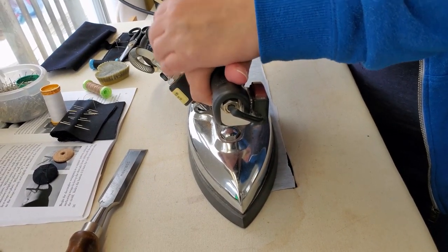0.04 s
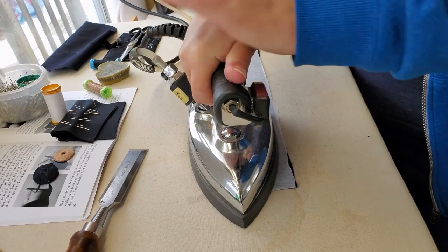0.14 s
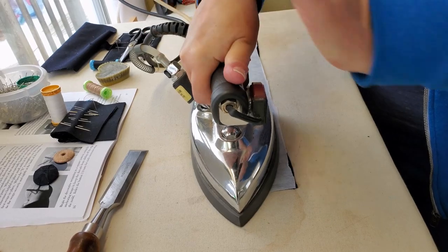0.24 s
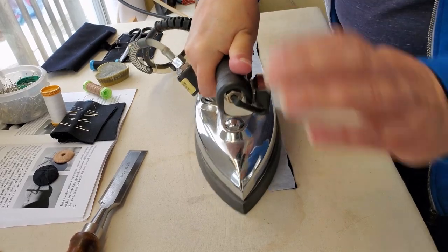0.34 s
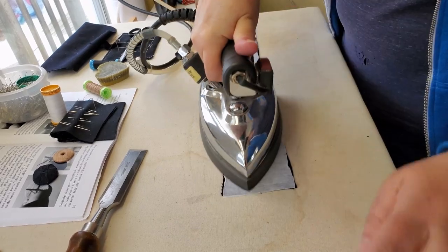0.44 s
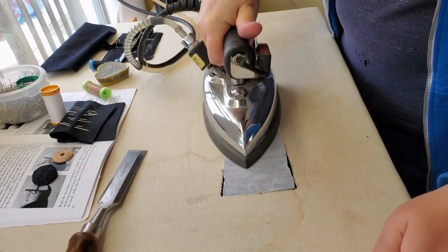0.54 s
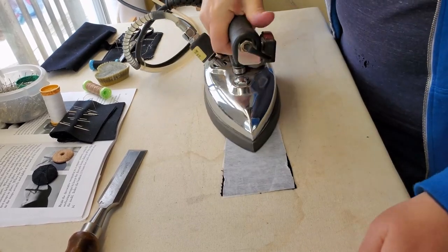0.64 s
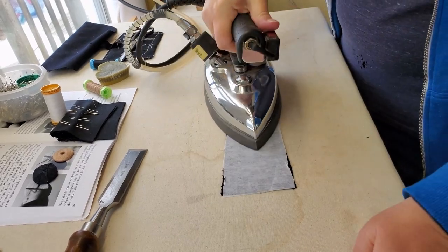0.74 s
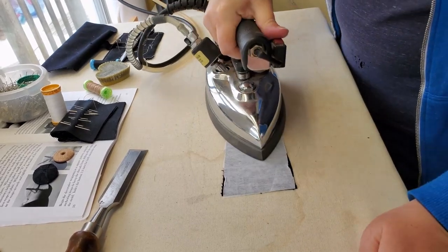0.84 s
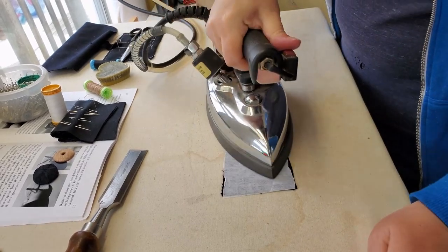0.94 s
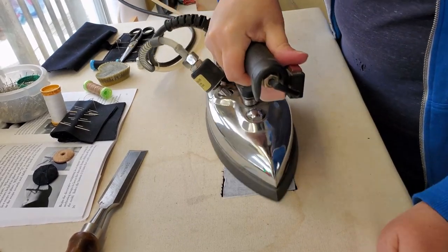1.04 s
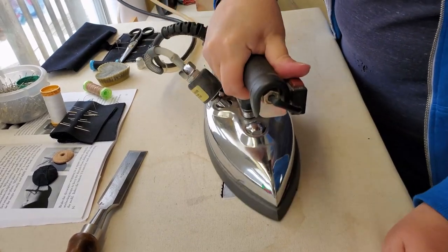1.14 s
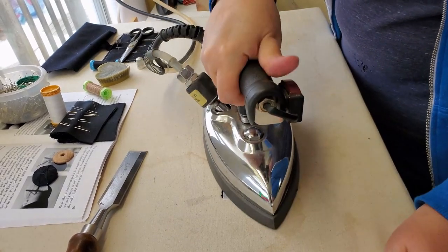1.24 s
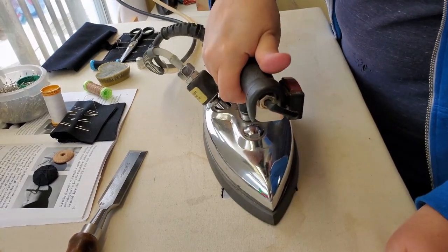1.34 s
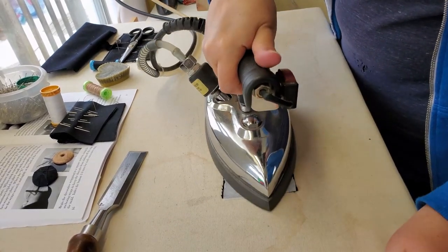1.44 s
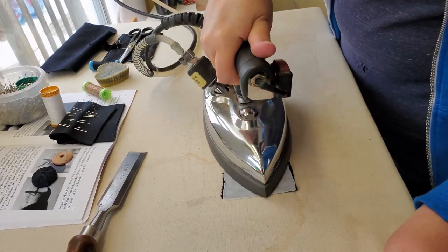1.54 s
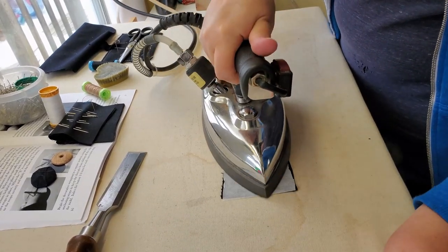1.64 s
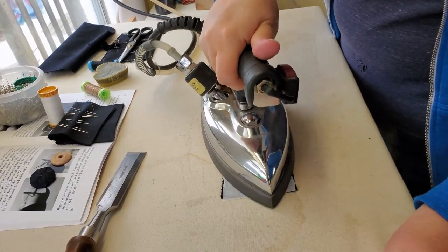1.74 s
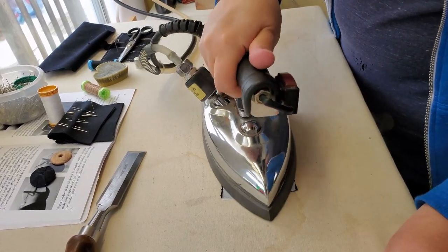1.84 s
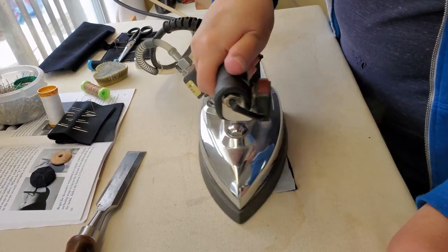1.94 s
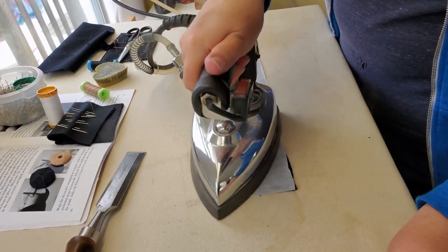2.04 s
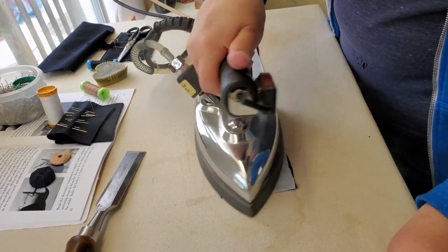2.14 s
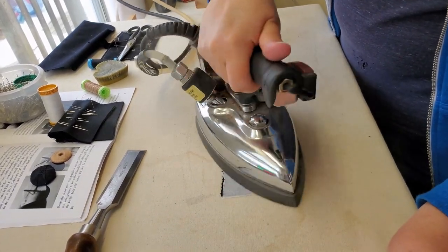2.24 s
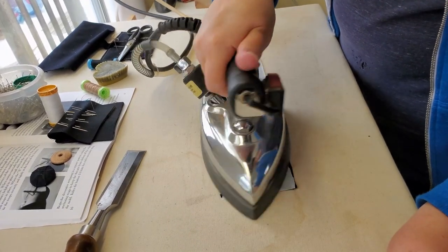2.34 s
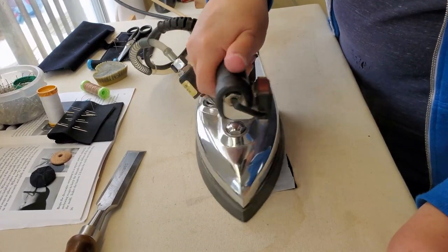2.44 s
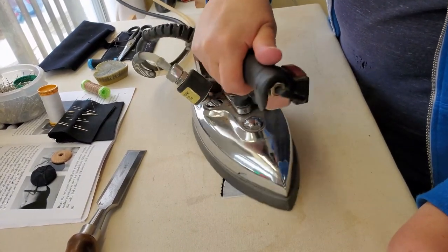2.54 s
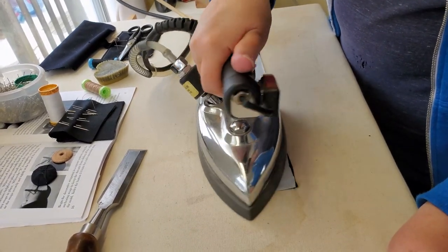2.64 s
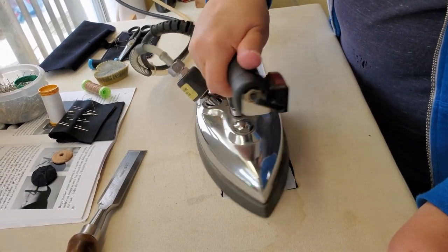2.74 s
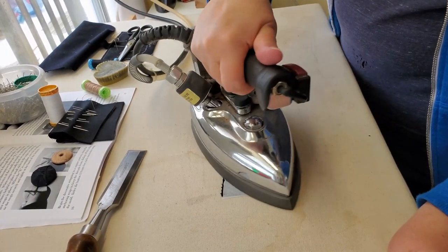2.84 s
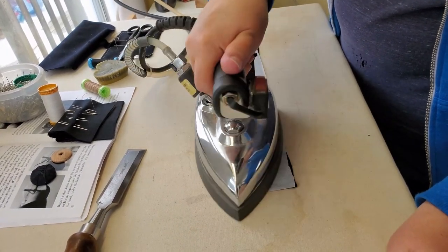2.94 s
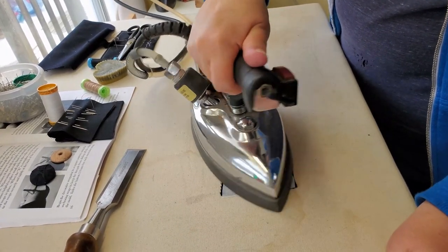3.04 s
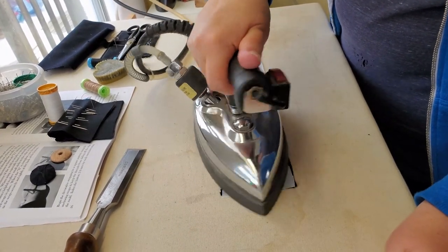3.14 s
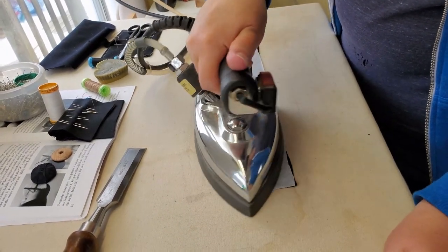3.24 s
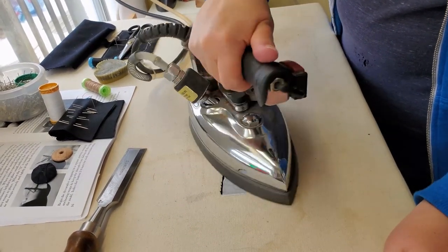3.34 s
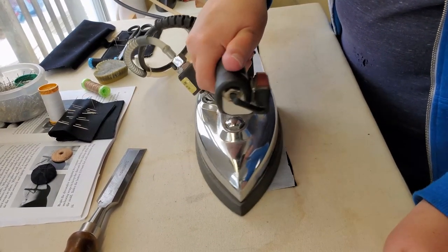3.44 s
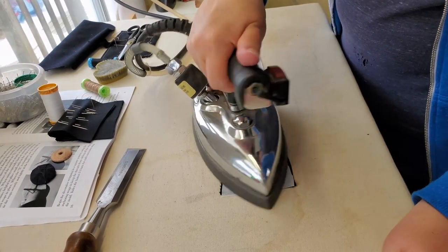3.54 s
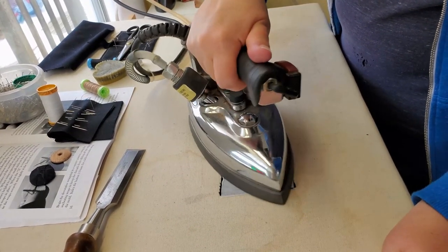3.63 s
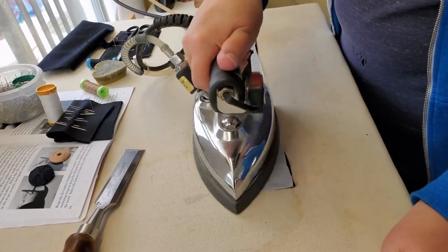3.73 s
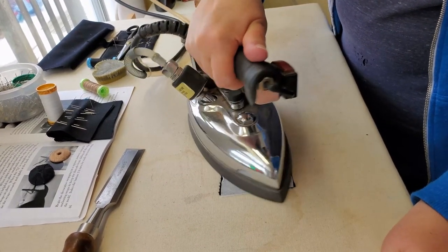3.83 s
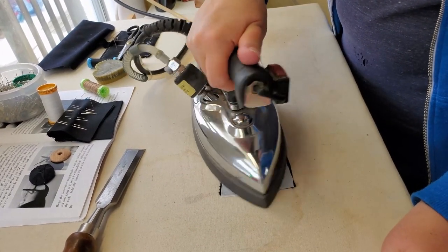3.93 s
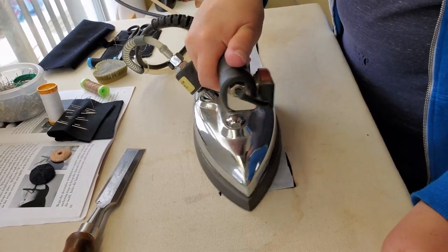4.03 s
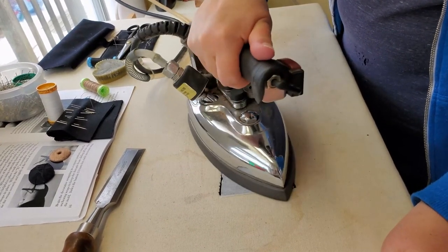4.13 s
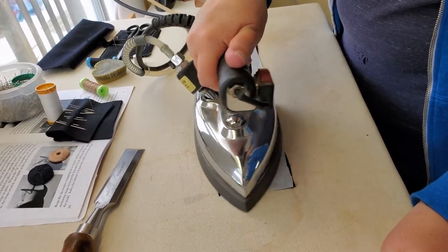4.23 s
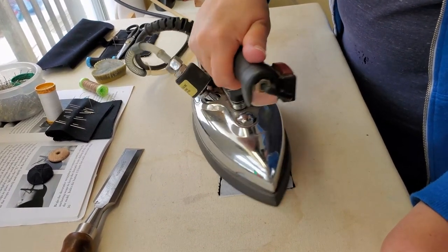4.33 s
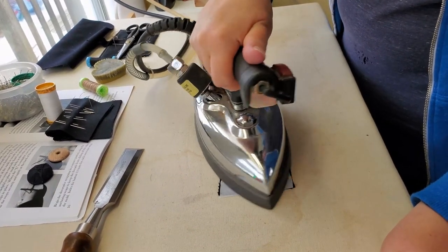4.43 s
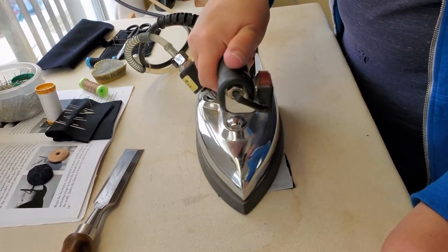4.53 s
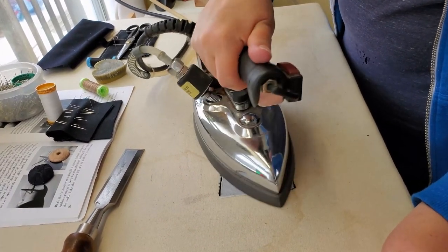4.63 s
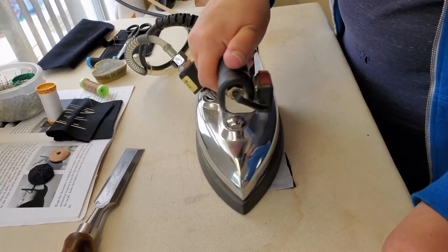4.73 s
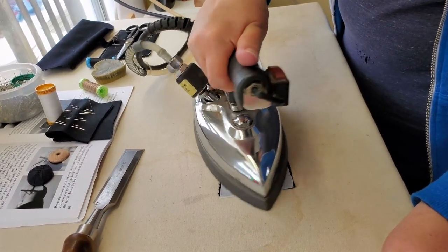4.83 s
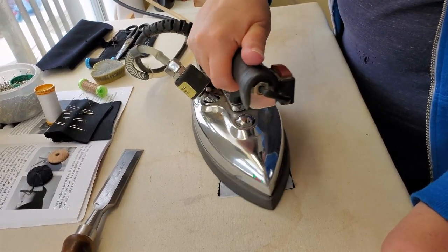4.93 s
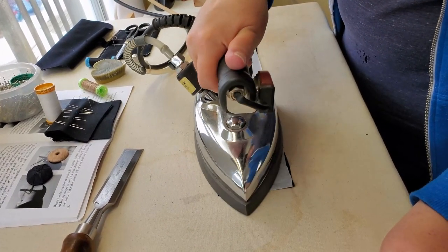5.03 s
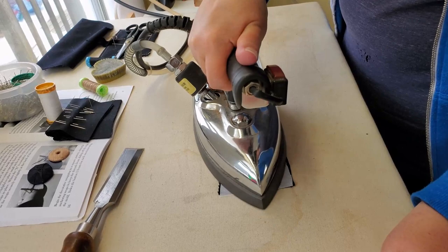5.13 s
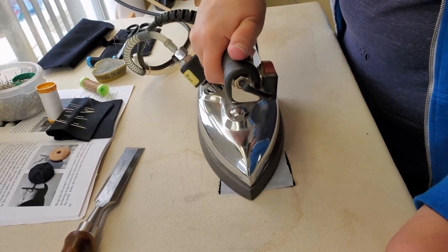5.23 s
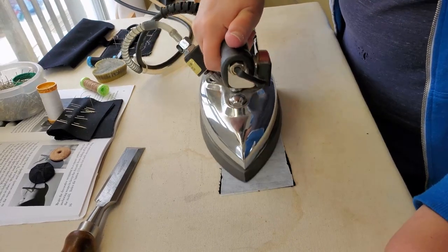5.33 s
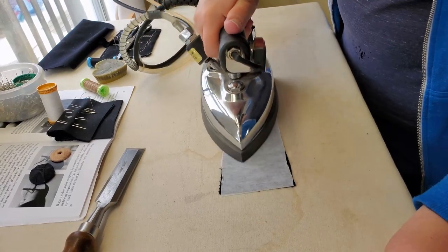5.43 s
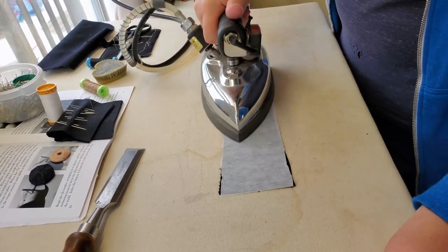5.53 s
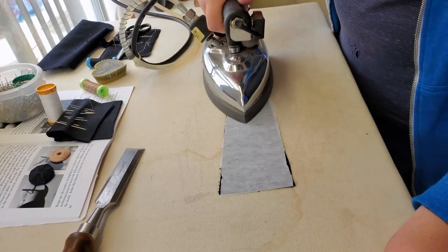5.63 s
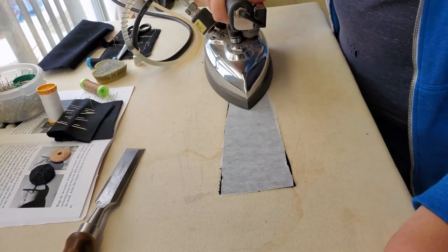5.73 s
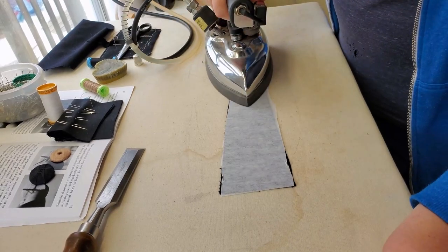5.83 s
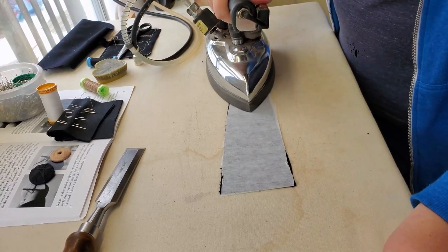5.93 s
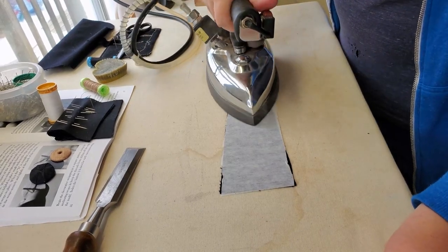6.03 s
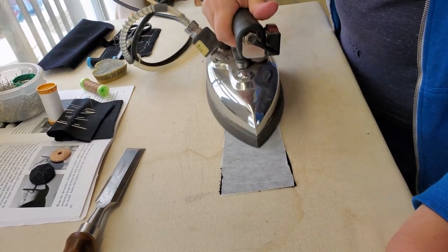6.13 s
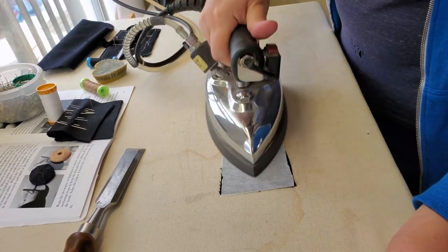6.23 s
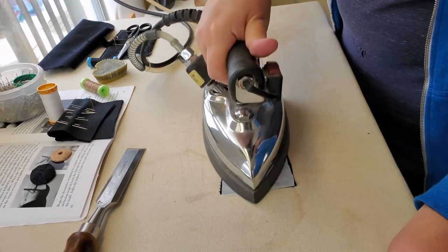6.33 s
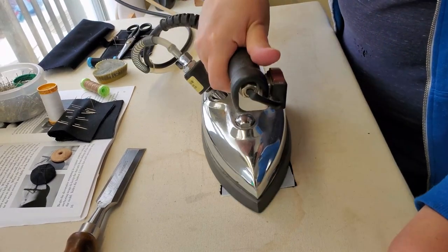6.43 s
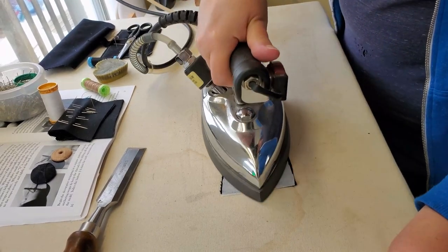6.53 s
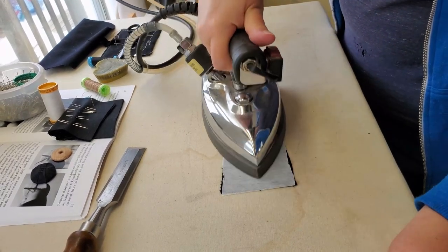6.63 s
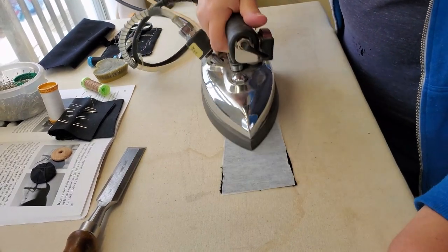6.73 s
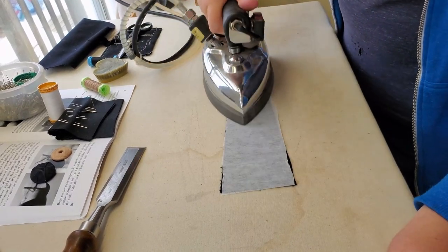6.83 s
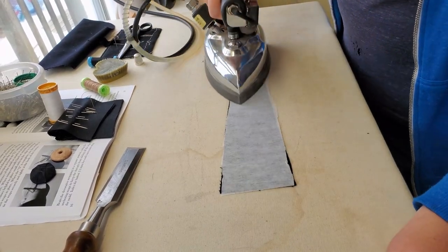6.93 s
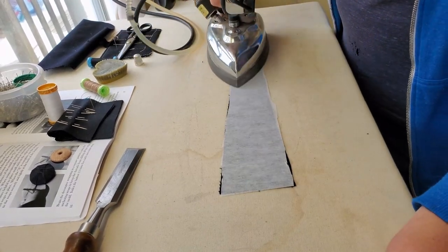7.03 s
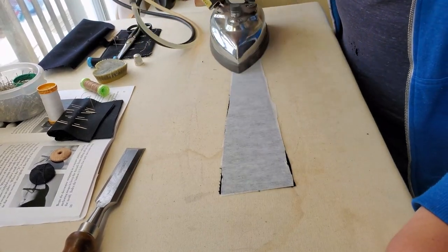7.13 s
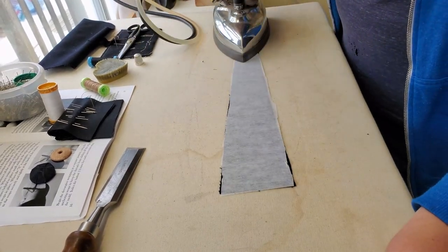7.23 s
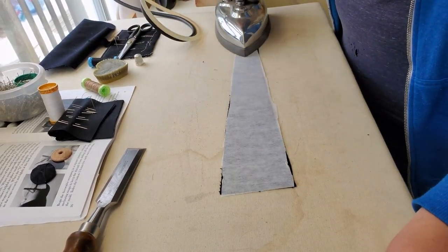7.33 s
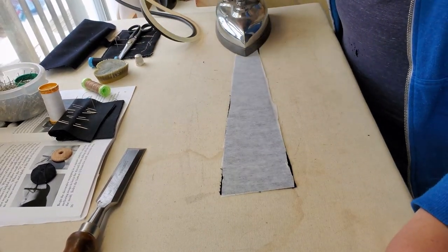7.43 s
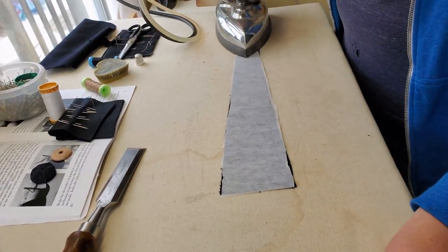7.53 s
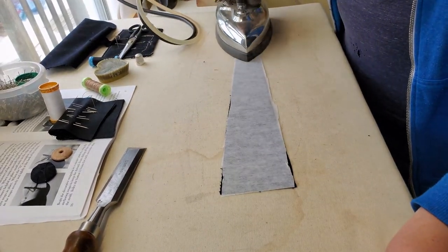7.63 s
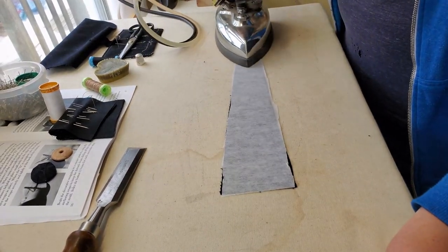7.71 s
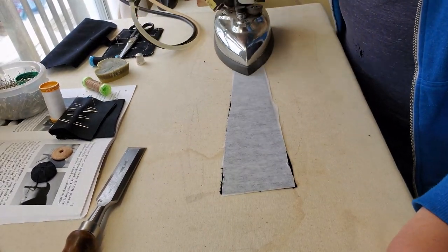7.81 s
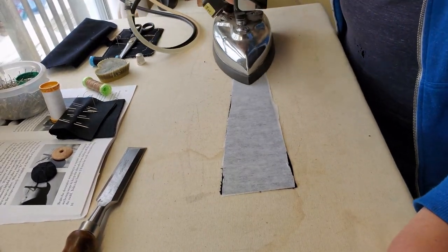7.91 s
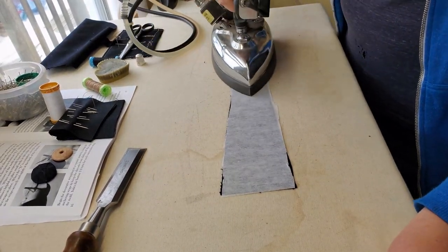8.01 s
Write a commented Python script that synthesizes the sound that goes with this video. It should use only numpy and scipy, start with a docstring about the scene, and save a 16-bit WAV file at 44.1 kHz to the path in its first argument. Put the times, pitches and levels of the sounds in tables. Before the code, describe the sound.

A heavy steel steam iron slides over a strip of fabric on a padded table, close to the microphone in a small, quiet room. The cloth hisses softly while the sole scrapes, ticks and clanks once against metal. The iron then scrubs quickly back and forth on one spot as the table rumbles. Longer strokes follow, with soft thumps, faint thin squeals and two more sharp, briefly ringing clanks.

```python
"""A small, quiet room, the stereo microphone close to a padded table. A heavy steel steam iron glides over
a strip of fabric, scrubs quickly on one spot, then glides again: the fibres hiss and the table rumbles.
The sole scrapes and judders as it turns, thumps the padding, and now and then squeals thinly.
At the far end of three long strokes the iron clanks against metal, probably its rest, and rings."""
import sys
import numpy as np
from scipy import signal
from scipy.fft import rfft, irfft, next_fast_len
from scipy.io import wavfile
from scipy.ndimage import map_coordinates

SR = 44100
rng = np.random.default_rng(int(sys.argv[2]) if len(sys.argv) > 2 else 0)


def store_pcm(level_fs):
    """Save levels as 16-bit WAV."""
    pcm = np.round(np.clip(level_fs, -1, 1) * 32767).astype(np.int16)
    wavfile.write(sys.argv[1], SR, np.atleast_2d(pcm).T)


N = 355775

# spectra of rubbed cloth, the table and the sole's edge: (frequency [Hz], relative density [dB])
CLOTH_SPECTRUM = [(200, -10), (400, -16), (620, -17), (850, -6), (1170, -10), (1520, 4), (2400, 2),
                  (3200, -5), (4500, -10.5), (5300, -7), (5800, -13), (6800, -8), (7400, -18.5),
                  (9200, -15.5), (15800, -16)]
TABLE_SPECTRUM = [(20, -19.5), (35, -10.5), (49, -14), (59, 4.5), (66, -0.5), (73, -1.5), (80, -6),
                  (88, -0.5), (106, -12), (133, -22), (170, -15.5), (260, -25.5), (600, -38.5), (1300, -87)]
EDGE_SPECTRUM = [(150, -3), (600, -9.5), (900, -10), (1200, 1), (1700, 2), (2500, 0), (3300, -0.5),
                 (5200, 0), (5700, -8.5), (6600, -0.5), (8000, -10), (10700, -10.5), (15800, -10.5)]
# resonances of the sole while pressed down: (frequency [Hz], width [Hz], relative level [dB])
SOLE_MODES = [(800, 90, -13), (930, 16, 5), (1490, 60, -8), (1884, 16, -2), (2120, 36, 0), (3343, 70, -6),
              (4850, 70, -9), (5345, 50, -7), (6595, 45, -6), (9330, 42, -15), (10700, 80, -15)]
# stereo image close to the microphone: (frequency [Hz], likeness [-1..1], left-right [dB], left lead [rad])
NEAR_IMAGE = [(60, .96, .5, 0), (130, .9, 0, 0), (380, .65, -2, 0), (800, .55, 0, .4), (1600, .4, -5, 2.3),
              (2400, .4, -5.5, 3.7), (4400, .3, -1, 6.4), (8000, .3, -.5, 6.3), (14000, .85, 1.5, 6.3)]
STOP_S = 0.039  # the iron comes to rest in this time


def amp(db):
    """Decibels to gain."""
    return 10 ** (np.asarray(db) / 20)


def unit(x):
    """Scale to rms 1."""
    return x / np.sqrt(np.mean(x ** 2) + 1e-20)


def along(points, hz, column=1):
    """One column of a frequency table, read on a log axis."""
    table = np.transpose(points)
    return np.interp(np.log(hz + 1), np.log(table[0] + 1), table[column])


def clock():
    """The time of every sample."""
    return np.arange(N) / SR


def curve(rows):
    """One value per sample from (time, value) rows."""
    return np.interp(clock(), *np.transpose(rows))


def wobble(rate):
    """A smooth random curve, rate knots a second."""
    return map_coordinates(rng.standard_normal(int(N * rate / SR) + 4), [clock() * rate])


def filtered(x, response):
    """Filter x by a function of frequency."""
    n = x.shape[-1]
    m = next_fast_len(n + SR // 4)
    return irfft(rfft(x, m) * response(np.fft.rfftfreq(m, 1 / SR)), m)[..., :n]


def above(x, corner_hz):
    """The treble of x."""
    return filtered(x, lambda hz: 1 / (1 + (corner_hz / (hz + 1)) ** 4))


def panned(balance_db):
    """Left and right gains."""
    gains = amp(np.array([np.atleast_1d(balance_db), -np.atleast_1d(balance_db)]) / 2)
    return gains / np.sqrt(np.mean(gains ** 2, axis=0))


def rush(spectrum, image=NEAR_IMAGE, size=N):
    """Stereo noise of rms 1 with a colour and an image at the microphone."""
    def mid_side(hz):
        width = np.arccos(np.clip(along(image, hz), -.99, .99)) / 2
        return amp(along(spectrum, hz)) * [np.cos(width), np.sin(width)]

    def left_right(hz):
        lead = np.outer([1, -1], along(image, hz, column=3))
        return panned(along(image, hz, column=2)) * np.exp(.5j * lead)

    mid, side = filtered(rng.standard_normal((2, size)), mid_side)
    return unit(filtered(np.array([mid + side, mid - side]), left_right))


def add(track, s, sound):
    """Mix a sound in at time s."""
    part = track[:, max(round(s * SR), 0):][:, :sound.shape[-1]]
    part += sound[..., :part.shape[-1]]


def burst(t, attack, t60):
    """An envelope that rises from t = 0 and dies away."""
    t = np.maximum(t, 0)
    return (1 - np.exp(-t / attack)) * amp(-60 * t / t60)


def gate(start, end, attack, release):
    """A smooth rise from the start, a hold, and a smooth fall around the end."""
    rise = np.clip((clock() - start) / attack, 0, 1)
    fall = np.clip((end - clock()) / release + .5, 0, 1)
    return np.sin(np.pi / 2 * rise) * np.sin(np.pi / 2 * fall)


def gliding(treble_hz=7200):
    """Long strokes: fibres hiss and the table rumbles; the hiss changes sheen along the strip."""
    # strokes, levels relative: (start [s], end [s], run-up [s], rubbing [dB],
    # treble at start [dB], treble at end [dB], rumble [dB])
    strokes = [(-.05, 0.386, 0.14, -78.5, -18, 1.5, -60), (0.268, .8, .14, -70.5, -4, -11, -58),
               (.88, 1.344, .05, -78.5, 5, 0.5, -68), (1.317, 1.735, 0.1, -79, -14, 2, -61.5),
               (1.697, 2.355, 0.16, -72.5, -19.5, -7.5, -61.5), (5.17, 5.82, 0.077, -72, -5.5, 2, -73.5),
               (6.05, 6.484, 0.084, -75, 6, 2, -78), (6.396, 6.891, 0.066, -75.5, -16, -0.5, -83),
               (6.822, 7.332, .16, -70.5, 0.5, 0, -64.5), (7.578, 8.197, 0.084, -71, -8, 3, -76)]
    # the hand never holds the iron quite still
    rub_power, treble_power, rumble_power = (np.full(N, amp(db) ** 2) for db in (-82.5, -82.5, -78.5))
    for start, end, attack, db, first_db, last_db, table_db in strokes:
        speed = gate(start, end, attack, STOP_S)
        sheen_db = np.interp(clock(), [start, end], [first_db, last_db]) + 5
        rub_power += (speed * amp(db)) ** 2
        treble_power += (speed * amp(db + sheen_db)) ** 2
        rumble_power += (speed * amp(table_db)) ** 2
    fibres = rush(CLOTH_SPECTRUM)
    fizz = above(fibres, treble_hz)
    hiss = np.sqrt(rub_power) * (fibres - fizz) + np.sqrt(treble_power) * fizz
    hiss *= amp(6.5 - 0.9 * wobble(10))
    return hiss + amp(-4) * np.sqrt(rumble_power) * rush(TABLE_SPECTRUM)


def scrubbing(start_s=2.376, first_cycle_s=.272, quicken_s=.0023, push_share=.56, turn_level=.343):
    """Quick pushes and pulls on one spot hiss most in mid-stroke; each turn bumps and rocks the table."""
    # effort of the hand: (time [s], relative level [dB])
    effort = [(2.39, -65), (2.8, -65.5), (3.5, -61.5), (4.05, -62.5), (4.45, -66), (5.15, -66.5)]
    # weight rocking the table: (time [s], relative level [dB])
    rocking = [(2.48, -75), (2.7, -63.5), (2.95, -60.5), (3.65, -64), (4.0, -57), (4.42, -70.5),
               (4.65, -64), (5.02, -61.5), (5.2, -74)]
    # the table's answer to a turn: (frequency [Hz], relative density [dB])
    bump_spectrum = [(30, -10), (70, -4), (125, 5), (180, -2.5), (300, -16), (450, -16.5), (900, -30),
                     (3000, -80)]
    cycles = first_cycle_s - quicken_s * np.arange(11)
    lengths = np.outer(cycles, [push_share, 1 - push_share]).ravel()
    turns = start_s + np.cumsum(lengths) - lengths
    progress = np.interp(clock(), turns, np.arange(len(turns)))
    stroke = progress.astype(int)
    speed, pulling = np.abs(np.sin(np.pi * progress)), stroke % 2
    level = amp(curve(effort) + 1) * (turn_level + (1 - turn_level) * speed * amp(-2.5 * pulling))
    sheen = amp(speed * np.where(pulling, 0, 3)) - 1  # pushes run against the nap and are brighter
    fibres = rush(CLOTH_SPECTRUM)
    hiss = level * (fibres + sheen * above(fibres, corner_hz=3420))
    rumble = amp(1.5) * (1 - 0.44 * speed) * rush(TABLE_SPECTRUM)
    bumps = amp(-3) * burst(clock() - turns[stroke], attack=.01, t60=.2) * rush(bump_spectrum)
    table = amp(curve(rocking)) * (rumble + bumps)
    return gate(turns[0] - STOP_S, turns[-1] + STOP_S, STOP_S, STOP_S) * (hiss + table)


def scraping(bite_s=.04, let_go_s=.086):
    """Tiny slips of the sole's edge rasp and excite its resonances; a harder bite reaches higher ones."""
    # the edge bites, drags and eases off, levels relative:
    # (start [s], end [s], bite [dB], easing [dB/s], ring [dB], ring roll-off [Hz])
    scrapes = [(0.0, 0.286, -70, 24, 8.5, 1190), (0.382, 0.836, -61, 13.5, 2.5, 1590),
               (1.689, 2.148, -57, 4.5, -0.5, 5530)]

    def sole(hz):
        return sum(amp(db) * 1j * hz * width / (centre ** 2 - hz ** 2 + 1j * hz * width)
                   for centre, width, db in SOLE_MODES)

    grain = unit(amp(1.5 * wobble(400) + wobble(37)))
    slips = rng.standard_normal((2, N)) + 1.1 * rng.standard_normal(N)
    drag, drive = np.zeros(N), np.zeros((2, N))
    for start, end, db, easing, body_db, reach_hz in scrapes:
        level = amp(db - easing * np.clip(clock() - start, 0, 1))
        force = grain * gate(start, end, bite_s, let_go_s) * level
        drag += force
        drive += amp(body_db) * filtered(force * slips, lambda hz: 1 / (1 + 1j * hz / reach_hz))
    ring = filtered(drive, sole) / np.std(filtered(slips, sole))
    return amp(-4) * drag * rush(EDGE_SPECTRUM) + amp(-1) * ring * panned(-1.5)


def clanks(crack_t60=0.045):
    """At the far end, two steel contacts a few ms apart crack, ring the iron and wake the room."""
    # steel on steel, levels relative: (time [s], crack [dB], second contact after [s],
    # second contact [dB], strike place [0 = centre])
    strikes = [(.8604, 0, .004, -4, -1), (5.8333, 1, .005, 0, 0), (7.3168, -1.5, .0045, 2.5, 1.2)]
    # colour of the crack: (frequency [Hz], relative density [dB])
    crack_spectrum = [(100, -43.5), (600, -29), (950, -17.5), (1300, -19), (1900, -9), (2400, -15.5),
                      (3000, -6.5), (4200, -10.5), (5400, -3), (6700, -1.5), (7600, -3), (9500, -1.5),
                      (11000, 2), (13000, 1), (15800, -9)]
    # image of the far end: (frequency [Hz], likeness [-1..1], left-right [dB], left lead [rad])
    far_image = [(100, .9, 0, 0), (700, .6, 3, 0), (1400, .1, -3, 0), (2400, 0, 0, 0), (4400, 0, -3, 0),
                 (6400, 0, -2, 0), (8500, .1, 7, 0), (13000, .3, 1, 0)]
    # decay of the small room: (frequency [Hz], t60 [s])
    room_decay = [(100, 0.9), (1000, 0.24), (2500, 0.27), (6000, 0.22), (15000, .17)]
    out, t = np.zeros((2, N)), np.arange(SR // 2) / SR
    for s, db, delay, second_db, place in strikes:
        first = burst(t, 0.00029, crack_t60)
        second = amp(second_db) * burst(t - delay, 0.0029, crack_t60)
        chatter = unit(amp(-wobble(2000)[:len(t)]))
        crack = amp(db - 12) * np.hypot(first, second) * chatter * rush(crack_spectrum, far_image, len(t))
        hz, age, bands = signal.stft(rush(crack_spectrum, far_image, len(t)), SR, nperseg=256)
        decay = amp(-60 * age / along(room_decay, hz)[:, None])
        tail = signal.istft(bands * decay, SR, nperseg=256)[1][:, :len(t)]
        room = amp(-23) * tail * (1 - np.exp(-t / 0.021)) * panned(-1)
        add(out, s, crack + iron_ring(t, place) + room)
    return out


def iron_ring(t, place, spread=0.006, crowded_hz=5000):
    """The struck body: low modes ring cleanly, high ones are clusters that beat, blur and die sooner."""
    # the iron's modes: (frequency [Hz], level [dB], base t60 [s], change with place [dB], left-right [dB])
    modes = [(872, -56.5, 0.3, -5, 2), (933, -50.5, 0.33, -3, 1), (1148, -50.5, 0.42, 4, -5),
             (1470, -53, 0.22, 0, -6), (2062, -31, 0.225, 0, -8), (2218, -43, 0.18, 1, -6),
             (2600, -42.5, 0.27, 6, -4), (2890, -41, 0.17, -1, -1), (3198, -44, 0.18, 3, -2),
             (3677, -44, 0.2, 1, -2), (5332, -36, 0.2, -1, -4), (5932, -55, 0.43, 5, -2),
             (6448, -37, 0.19, -1, -7), (6910, -33, 0.12, 0, -5), (8091, -36, 0.14, -1, 4),
             (8880, -41, 0.18, -1, 2), (9360, -40, 0.2, 2, 1), (10490, -34, 0.16, 2, 0),
             (10830, -33, 0.16, 1, -1), (11270, -34, 0.14, 0, -2), (12050, -31, 0.12, 2, -3),
             (12340, -31, 0.12, 1, -3), (13040, -34, 0.15, -2, -2), (13560, -33, 0.14, -1, -2)]
    ring = np.zeros((2, len(t)))
    for hz, db, t60, place_db, side_db in modes:
        blur = hz ** 4 / (hz ** 4 + crowded_hz ** 4)
        lines = hz * (1 + spread * blur * np.r_[0, rng.standard_normal(size=6)])  # main line, neighbours
        shares = np.sqrt(np.r_[1 - blur, np.full(6, blur / 6)])
        # the shorter the wave, the more its phase differs across the microphone
        phases = rng.uniform(0, 2 * np.pi, len(lines)) + rng.normal(0, .4 + .2 * blur, (2, len(lines)))
        waves = np.exp(2j * np.pi * np.outer(lines, t))
        tone = np.sqrt(2) * np.imag(shares * np.exp(1j * phases) @ waves)
        envelope = burst(t, 0.006, t60 * (1 - 0.05 * blur))
        ring += amp(db + place * place_db) * panned(side_db) * envelope * tone
    return ring


def thumps():
    """The weight settles on the padding: a soft low swing of the table with a scuff of cloth."""
    # landings: (time [s], thud [dB], pitch [Hz], time to peak [s], scuff [dB])
    landings = [(.64, -55.5, 71.2, 0.032, -70.5), (0.873, -61, 86.5, .03, -80),
                (1.27, -61.5, 300, 0.011, -60), (1.682, -62, 135, 0.012, -69),
                (5.203, -55, 71.6, 0.024, -64), (5.258, -73.5, 345, 0.021, -59),
                (5.854, -59, 61.4, 0.027, -76), (6.131, -65.5, 69.4, 0.0092, -84.5),
                (7.334, -54.5, 63, 0.017, -85.5), (7.607, -62, 68.7, 0.019, -60),
                (7.633, -60.5, 65.7, 0.019, -62)]
    # scuffed cloth: (frequency [Hz], relative density [dB])
    scuff_spectrum = [(100, 2), (350, 3), (600, -5.5), (1000, 5), (2000, 6.5), (4000, -10),
                      (8000, -17.5), (15000, -16.5)]
    out, t = np.zeros((2, N)), np.arange(SR // 3) / SR
    for s, db, hz, peak_s, cloth_db in landings:
        swell = t / peak_s * np.exp(1 - t / peak_s)
        rumble = rush([(30, -8), (hz, 0), (2 * hz, -6), (1500, -40), (4000, -80)], size=len(t))
        thud = unit(np.sin(2 * np.pi * hz * t)) + 0.82 * rumble
        scuff = rush(scuff_spectrum, size=len(t))
        add(out, s, swell * (amp(db) * thud + amp(cloth_db) * scuff))
    return out


def ticks(ring_stretch=2.4):
    """The edge catches and lets go; relieved of pressure, the sole rings longer."""
    # light catches: (time [s], click [dB], ring [dB])
    catches = [(.056, -59, -73), (.103, -60, -70), (.401, -53, -57), (.5, -57, -70), (.652, -54, -68),
               (2.104, -53, -66), (2.144, -54, -65), (2.185, -48, -54), (6.131, -60, -80),
               (7.612, -56, -78), (7.641, -56, -75)]
    out, t = np.zeros((2, N)), np.arange(SR // 2) / SR
    for s, db, ring_db in catches:
        ring = np.zeros((2, len(t)))
        for hz, width, mode_db in SOLE_MODES:
            t60 = ring_stretch * np.log(1000) / (np.pi * width)
            phase = 2 * np.pi * hz * t + rng.normal(0, .7, (2, 1))
            ring += amp(mode_db) * burst(t, .0005, t60) * np.sin(phase)
        click = burst(t, attack=.0005, t60=.05) * rush(EDGE_SPECTRUM, size=len(t))
        add(out, s, amp(db) * click + amp(ring_db) * ring / np.sqrt(2))
    return out


def judder(start_s=0.405, end_s=0.774, slip_hz=161.6, jitter=0.0366, growth_db_per_s=18.5):
    """The sole sticks and slips unsteadily: one short low groan, growing as the pull speeds up."""
    phase = 2 * np.pi * np.cumsum(slip_hz * (1 + jitter * wobble(61))) / SR
    db = -67 + growth_db_per_s * np.clip(clock() - start_s, 0, 1) + 4 * wobble(40.9)
    groan = unit(np.sin(phase) + amp(-17) * np.sin(2 * phase))
    return gate(start_s, end_s, attack=.025, release=.025) * amp(db) * groan


def overruns():
    """The tip runs off the strip and turns on the bare padding with a hollow swish."""
    # swishes: (peak time [s], length [s], level [dB])
    swishes = [(1.388, 0.33, -74.5), (6.554, 0.32, -76)]
    # rubbed padding: (frequency [Hz], relative density [dB])
    padding_spectrum = [(200, -20), (500, -5), (780, 8), (1050, 5), (1500, -27), (4000, -22), (15800, -46)]
    swell = sum(amp(db) * np.cos(np.pi * np.clip((clock() - s) / length, -.5, .5))
                for s, length, db in swishes)
    return swell * rush(padding_spectrum)


def squeals(waver_hz=36, flutter_db=3):
    """Sliding forward, the sole sings at a few high modes in faint fluttering tones."""
    # thin tones: (start [s], end [s], pitch [Hz], level [dB])
    tones = [(1.37, 1.773, 5900, -72.5), (1.83, 2.198, 5925, -71), (1.403, 2.0, 13900, -76),
             (6.058, 6.497, 8950, -76), (6.235, 6.904, 5940, -74.5), (7.653, 8.1, 9000, -82),
             (7.905, 8.1, 5938, -77)]
    out = np.zeros(N)
    for start, end, hz, db in tones:
        swell = np.sin(np.pi * np.clip((clock() - start) / (end - start), 0, 1))
        phase = 2 * np.pi * np.cumsum(hz + waver_hz * wobble(250)) / SR
        out += amp(db + flutter_db * wobble(89)) * swell * np.sin(phase)
    return out * panned(0)


def room_tone(air_db=-73, hum_db=-73, mains_hz=60):
    """Still air and a faint mains hum behind the table."""
    # the room's air: (frequency [Hz], relative density [dB])
    air_spectrum = [(20, -3.5), (60, 15.5), (120, 8.5), (300, 1.5), (600, -7), (1600, 3), (4000, -14),
                    (8000, -21), (15800, -16)]
    return amp(air_db) * rush(air_spectrum) + amp(hum_db) * np.sin(2 * np.pi * mains_hz * clock())


def scene():
    """Everything on and around the table, heard from close by."""
    cloth = gliding() + scrubbing() + overruns()
    return cloth + scraping() + ticks() + judder() + thumps() + clanks() + squeals() + room_tone()


def record(dry):
    """The recorder keeps nothing above its band limit."""
    top_hz = 15850
    return filtered(dry, lambda hz: hz < top_hz)


dry = scene()
out = record(dry)
store_pcm(out)
```